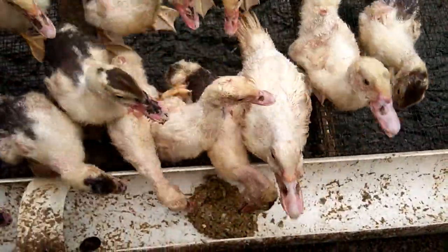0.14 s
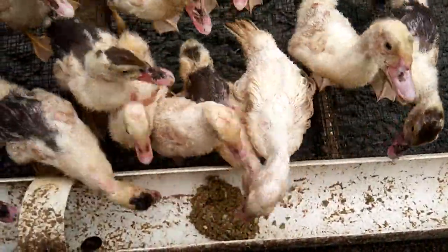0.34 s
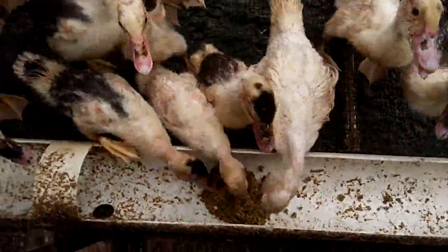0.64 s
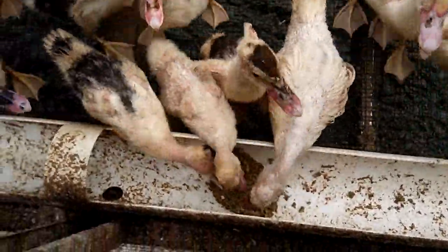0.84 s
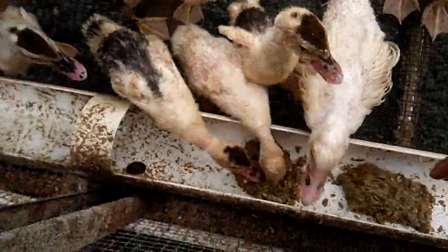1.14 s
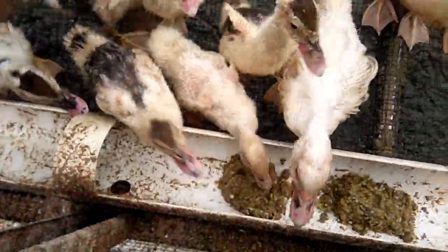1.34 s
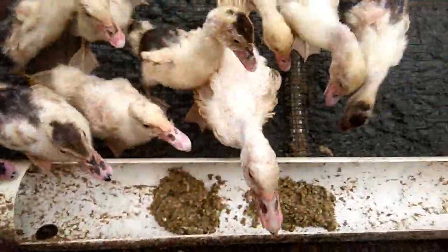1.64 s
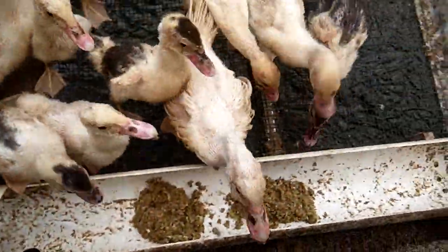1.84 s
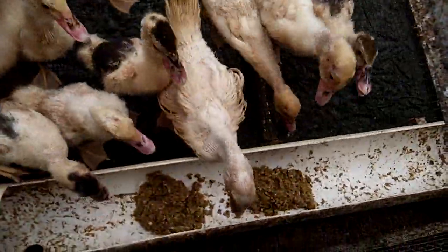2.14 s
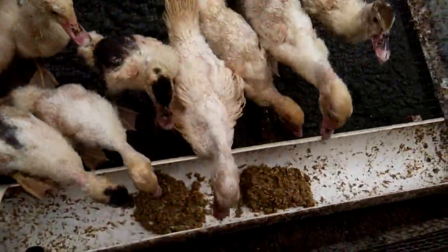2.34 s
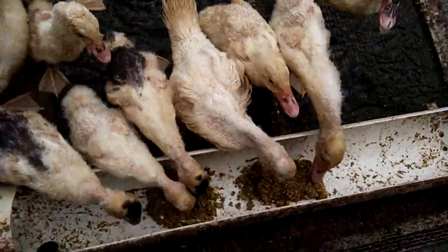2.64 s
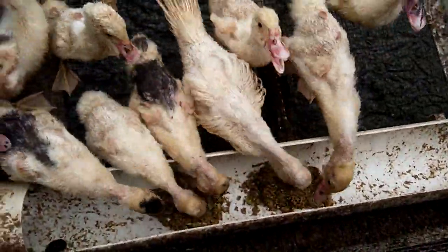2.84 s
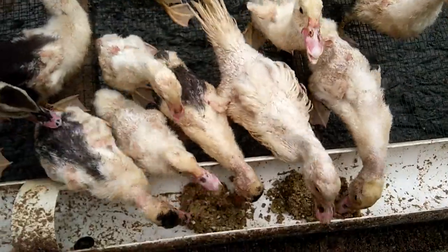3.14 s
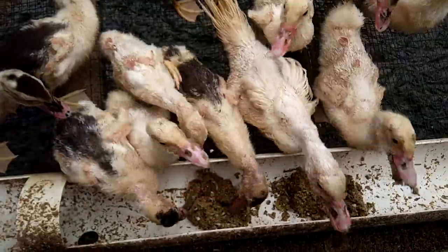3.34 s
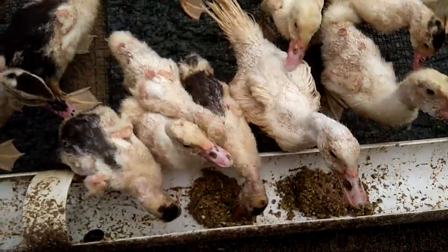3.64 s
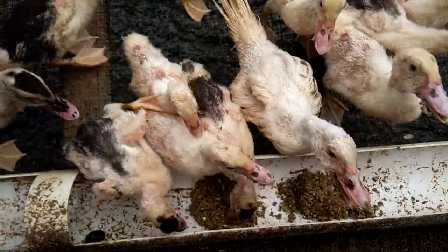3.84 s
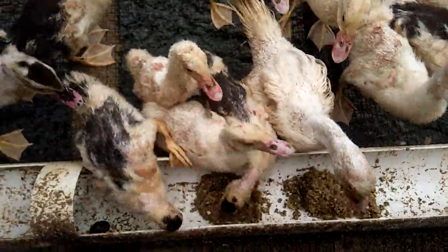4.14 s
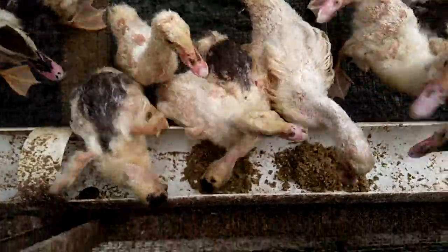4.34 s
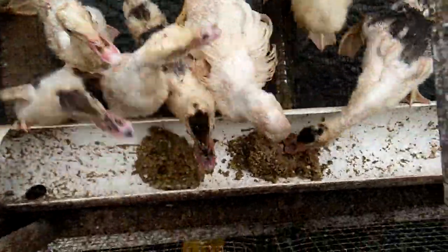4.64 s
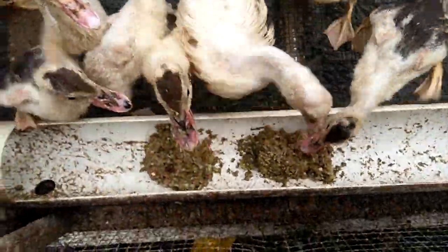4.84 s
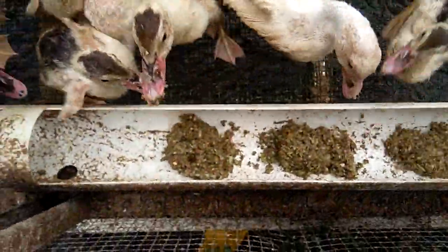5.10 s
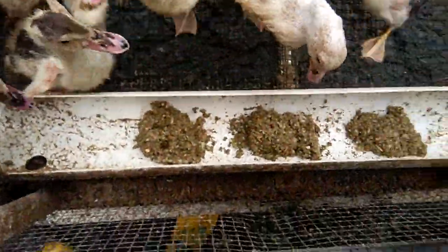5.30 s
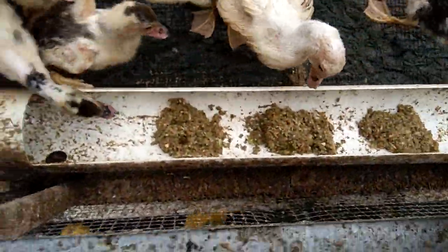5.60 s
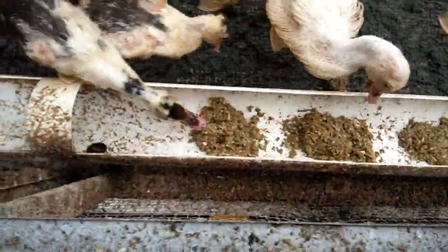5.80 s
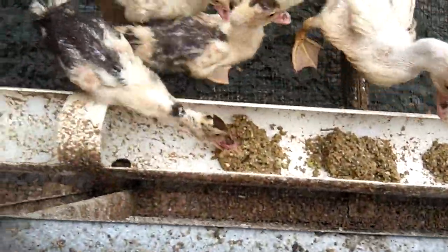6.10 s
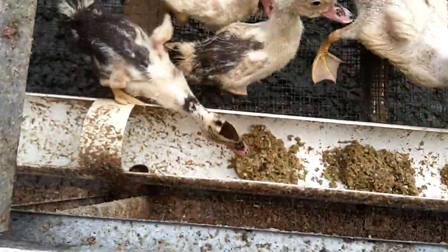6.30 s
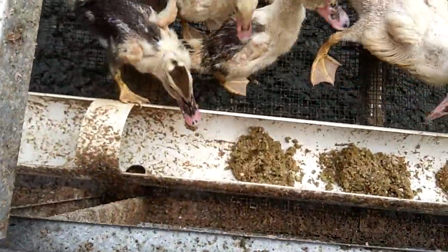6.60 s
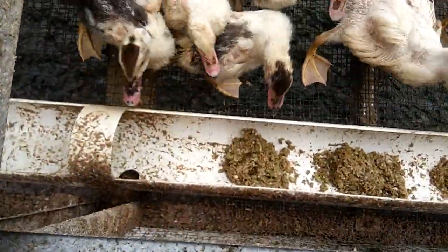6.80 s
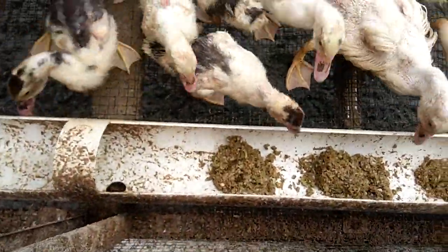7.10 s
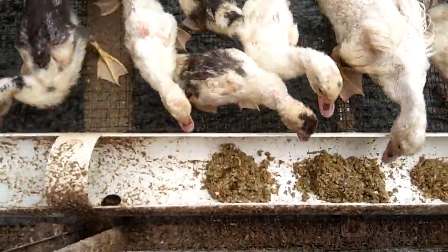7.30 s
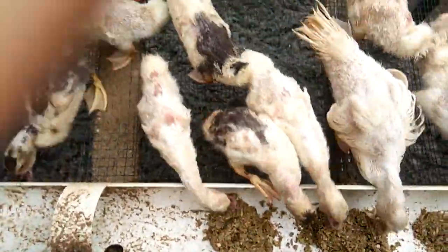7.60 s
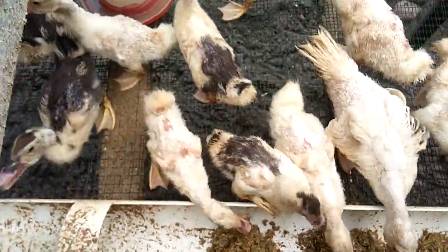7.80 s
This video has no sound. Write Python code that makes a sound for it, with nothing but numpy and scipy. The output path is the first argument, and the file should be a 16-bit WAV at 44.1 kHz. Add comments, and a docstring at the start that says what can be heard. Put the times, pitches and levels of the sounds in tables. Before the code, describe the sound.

Ducklings peep close to a small microphone in an outdoor pen, from start to end: very short whistles around 2 to 5 kHz, climbing, leaping up and dropping, often cracking into rasp. Faint low rumble and airy hiss lie beneath, the insects strongest in the first second. A dull knock comes at 0.5 s; at about 1.25 s a loud bright tick and hollow trough knocks follow until 1.5 s. From 1.9 to 4 s the peeps are mostly quieter, with faint ticks near 2.8 s and a distant hoarse fowl call at 3.4 s. From 4 s loud peeps crowd back, with low floor thumps at 4.2, 4.6 and 5.05 s, and knocks from 4.4 s. A sharp crack at 5.1 s starts more knocking until 5.4 s. Peeps space out near 6 s; a short, clearer far call at 6.8 s precedes a thump at 6.95 s. Peeping weakens after 7.7 s.

```python
"""Ducklings peep from start to end in quick rising and falling whistles, raspy at the top, over a low rumble
and insects that hiss most in the first second or so. From half a second on, bills and a scoop knock and tick
on a plastic feed trough. Near 3.4 s a hoarse fowl calls far off, then steps thump the pen floor; the fowl
calls again near 6.8 s. Whistles are bending sine waves; the other sounds are shaped noise and ringing tones."""
import sys
import numpy as np
from scipy import signal
from scipy.fft import rfft, irfft
from scipy.io import wavfile
from scipy.ndimage import uniform_filter1d

SR = 44100
rng = np.random.default_rng(int(sys.argv[2]) if len(sys.argv) > 2 else 0)


def put_to_file(sound):
    """Save the sound as 16-bit audio at rate SR, in the file named by the first command-line argument."""
    columns = np.atleast_2d(sound).T  # one column per channel
    safe = np.clip(columns, -1, 1)
    whole_steps = np.round(safe * 32767)
    wavfile.write(sys.argv[1], SR, whole_steps.astype(np.int16))


N = 350595  # length in samples

# The peeps. Each row: time of the kick (the sudden upward leap) in seconds, bend of the climb (1 is straight,
# near 0 levels off early), length of the rise in seconds, shoulder pitch before the kick in Hz, time from
# kick to end in seconds, crest pitch in Hz, slowness at the end of the fall in ms per kHz, swell during the
# rise in dB, level of the rise in dB, level of the fall in dB, level of the rasp in dB.
PEEPS = [(-.03, 0.61, 0.0264, 3150, 0.0557, 4370, 20.35, 1, -65.5, -45.5, -50.5),
         (0.11, 0.92, 0.0751, 3205, 0.0381, 4106, 14.6, 5, -45.5, -47, -57),
         (0.237, 0.55, 0.0542, 2987, 0.112, 3686, 31.5, 17, -34.5, -41, -48.5),
         (0.297, 0.53, 0.0489, 3116, 0.022, 3440, 35.3, 1, -34, -42, -44),
         (0.43, 0.926, 0.0555, 3020, 0.0595, 4900, 16, 7, -38, -44.5, -59),
         (0.561, 0.948, 0.049, 3727, 0.0507, 3665, 7.55, 24, -38, -35, -70),
         (0.573, 0.494, 0.0814, 3014, 0.0644, 4860, 6.97, 30, -33.5, -35, -40.5),
         (0.847, 1, 0.0696, 2982, 0.0725, 4800, 29.6, 17, -27.5, -32, -44),
         (.97, 0.445, 0.1364, 3372, 0.0485, 3423, 28.9, 10.5, -35.5, -37, -40.5),
         (.975, 0.908, 0.031, 3240, 0.0091, 3600, 11.5, 14, -30, -75.5, -30),
         (1.107, 0.377, 0.0699, 3403, 0.064, 4243, 12.3, 13.5, -48.5, -38, -50),
         (1.275, 0.485, 0.0509, 3145, 0.0147, 3128, 8.3, 40.5, -34.5, -61, -70.5),
         (1.303, 0.756, 0.0289, 3247, 0.0497, 4677, 11.5, 41.5, -32.5, -47.5, -42),
         (1.487, 0.447, 0.0495, 3381, 0.0351, 4410, 11.8, 61, -37, -56.5, -38),
         (1.535, 0.468, 0.0464, 3032, 0.0566, 4540, 21.6, 14, -36, -42, -50),
         (1.651, 0.351, 0.039, 3170, 0.0541, 4490, 12, 6.5, -37.5, -48, -59),
         (1.915, 0.196, 0.0474, 3794, 0.0747, 4560, 5.6, 16, -57.5, -58.5, -61.5),
         (2.07, 0.473, 0.0373, 3220, 0.0483, 4770, 15.4, -7.5, -55.5, -56.5, -66.5),
         (2.134, 0.39, 0.0255, 3047, 0.0623, 4630, 5.74, -6, -65.5, -61, -76.5),
         (2.294, 1, 0.0427, 3230, 0.056, 4106, 11.2, 12.5, -66, -69, -80.5),
         (2.439, 0.55, 0.0206, 2858, 0.0794, 4300, 30.8, 3.5, -91.5, -62, -80.5),
         (2.515, 0.307, 0.077, 2750, 0.012, 3200, 5, 5.5, -69, -71.5, -79),
         (2.581, 0.643, 0.06, 3162, 0.0458, 3730, 14.95, 1.5, -56, -40.5, -69.5),
         (2.593, 0.49, 0.0469, 3580, 0.0767, 4303, 10.4, 4.5, -53, -45, -60.5),
         (2.947, 0.92, 0.028, 3195, 0.0694, 4180, 9, -14.5, -68, -47, -68),
         (3.006, 0.74, 0.0374, 3020, 0.0609, 4100, 19.1, 10.5, -44, -49, -71.5),
         (3.088, 0.34, 0.0249, 3339, 0.046, 4292, 5.8, 14, -49.5, -59, -61.5),
         (3.179, 0.96, 0.0375, 3035, 0.0556, 4300, 9, 7.5, -65.5, -64, -81),
         (3.265, 0.45, 0.089, 2970, 0.0495, 3210, 45, 16.5, -65.5, -64.5, -78),
         (3.401, 0.566, 0.0402, 3393, 0.0578, 5075, 22.7, 16.5, -40.5, -52.5, -56),
         (3.485, 0.68, 0.035, 3170, 0.0506, 4600, 8.6, 54, -42, -62.5, -61),
         (3.633, 0.54, 0.0765, 3097, 0.057, 4780, 6, 22.5, -59, -58, -73),
         (3.738, 0.48, 0.0727, 3004, 0.0623, 4590, 29.6, 11.5, -56, -57.5, -65.5),
         (3.795, 0.984, 0.0534, 3010, 0.045, 4000, 30, -13.5, -65.5, -61, -75),
         (3.944, 0.91, 0.034, 3100, 0.019, 4190, 4.7, 10.5, -64, -60.5, -72.5),
         (4.016, 0.947, 0.0695, 3303, 0.0419, 4510, 13, 56.5, -38.5, -53, -58.5),
         (4.17, 0.271, 0.0809, 3080, 0.0506, 4730, 20.76, 33, -29.5, -32, -60.5),
         (4.386, 0.624, 0.0486, 3144, 0.0526, 4900, 12.6, 8.5, -35.5, -40.5, -61.5),
         (4.57, 0.32, 0.0665, 3247, 0.0575, 4920, 2.6, 35.5, -33, -41.5, -63),
         (4.654, 0.87, 0.0479, 2903, 0.0654, 4925, 14.9, 14, -33.5, -40, -66),
         (4.772, 0.65, 0.05, 3425, 0.021, 3800, 3.9, 18, -49.5, -57, -73.5),
         (4.816, 0.53, 0.0543, 3050, 0.0573, 4850, 10, 24.5, -35, -41, -46.5),
         (4.935, 0.162, 0.0497, 3107, 0.0651, 3970, 18.2, 4, -32, -51, -56),
         (5.008, 0.335, 0.0296, 3085, 0.0275, 3630, 15.3, 9.5, -37.5, -36.5, -72.5),
         (5.019, 1, 0.0162, 3158, 0.0439, 4820, 15.34, 1, -64.5, -43.5, -61.5),
         (5.18, 0.555, 0.0502, 2984, 0.0545, 4750, 19.2, 12, -30, -44.5, -49),
         (5.314, 0.1244, 0.05276, 3073, 0.10805, 4634, 19.5, -1.5, -35, -36.5, -56.5),
         (5.62, 0.69, 0.0349, 3086, 0.047, 4896, 5.5, 13, -43.5, -51.5, -65.5),
         (5.681, 0.299, 0.0313, 3053, 0.0558, 4664, 16.7, 15, -36, -47, -57),
         (5.774, 0.556, 0.0407, 3496, 0.049, 4275, 7.15, 15, -51, -52, -73),
         (6.055, 0.412, 0.0394, 3103, 0.05255, 4660, 17.2, 21, -30.5, -41.5, -47.5),
         (6.365, 0.21, 0.0514, 3056, 0.0595, 4430, 18.6, 32, -27, -33, -59.5),
         (6.433, 0.873, 0.0432, 2913, 0.0501, 4072, 16.7, 2.5, -38, -43.5, -65.5),
         (6.494, 0.83, 0.0427, 2943, 0.0693, 4300, 28.5, -14.5, -48.5, -53, -92.5),
         (6.642, 0.293, 0.0369, 2913, 0.0992, 4195, 57.7, 22, -47, -34, -67),
         (6.706, 0.543, 0.0534, 3008, 0.0695, 4950, 22.5, 18, -27.5, -38, -69),
         (6.865, .3, 0.02, 3665, 0.0599, 3436, 15.2, 30, -33.5, -31, -57),
         (6.875, 0.55, 0.053, 3195, 0.075, 3460, 33, 8, -34.5, -43, -74.5),
         (7.054, 0.494, 0.0837, 2933, 0.0664, 4690, 17.1, 31.5, -35.5, -43.5, -68),
         (7.285, 0.39, 0.0487, 3137, 0.0494, 4550, 7.9, 22.5, -30.5, -38, -56),
         (7.41, 0.324, 0.0644, 3065, 0.0423, 3990, 5.06, 21.5, -34.5, -44.5, -60),
         (7.475, 0.72, 0.011, 3360, 0.079, 4000, 44, 3.5, -62, -53.5, -82.5),
         (7.583, 0.164, 0.031, 3219, 0.07066, 4192, 15.6, 44.5, -34.5, -35.5, -40.5),
         (7.797, 0.153, 0.0594, 3112, 0.0447, 4660, 6.1, 5, -58.5, -60.5, -64),
         (7.893, 0.6, 0.035, 3136, 0.07, 4840, 8, 6.5, -63, -53, -80.5)]
# Tone colour of the broken voice. Each row: frequency in Hz, relative strength in dB per Hz.
RASP_COLOUR = [(1700, -31), (2300, -5.5), (3100, -15), (3900, -3), (4700, -8), (5300, -9.5), (6200, -2.5),
               (8500, -5.5), (12500, -7), (15500, -23.5)]
# Peeps whose voice splits into clear half-steps. Each row: time of the nearest kick in seconds, level in dB.
SPLITS = [(1.915, -57.5), (5.315, -56.5)]
# Sharp ticks of bill or scoop. Each row: start in seconds, level in dB, share of treble from 0 to 1.
TICKS = [(1.2546, -12, 0.84), (1.4309, -40, 0.8), (2.77, -52, 1), (2.8131, -46, 0.43), (2.833, -43, 0.17),
         (2.872, -47.5, 0.3), (2.8897, -41, 0.09), (2.912, -46, 0.08), (3.86, -46, 0.65),
         (5.0924, -17, 0.52), (5.0997, -37, 0.87)]
# Dull knocks on the trough. Each row: start in seconds, peak level in dB.
KNOCKS = [(0.472, -51.5), (1.257, -34.5), (1.338, -35.5), (1.398, -51), (1.449, -49), (4.36, -40.5),
          (4.422, -37), (4.629, -39.5), (4.772, -45.5), (5.089, -29.5), (5.183, -37.5), (5.242, -35.5),
          (5.3, -37), (5.411, -50), (3.045, -52.5), (7.63, -51.5)]
# Tones the trough rings at. Each row: middle frequency in Hz, relative level in dB, time to fade 60 dB in seconds.
TROUGH_TONES = [(461.2, -10, 0.028), (598.8, 13.5, 0.0306), (946.5, 2, 0.032)]
# Steps on the pen floor. Each row: start in seconds, level in dB, clatter of the boards in relative dB.
STEPS = [(4.208, -27, -14), (4.62, -30.5, -17), (5.055, -34.5, -10.5), (5.714, -42, -14),
         (3.544, -49.5, -8), (6.471, -36, -19), (6.946, -28.5, -13), (7.432, -48.5, -17.5)]
# Calls of the far fowl. Each row: start in seconds, length in seconds, base pitch in Hz, level in dB,
# hoarseness from 0 to 1.
FOWL_CALLS = [(3.419, 0.343, 803.2, -50, 0.88), (6.798, 0.13, 787.9, -55, 0.16)]
# Tone colour of the open air. Each row: frequency in Hz, relative strength in dB per Hz.
AIR_COLOUR = [(76, -35.5), (130, -1), (2270, -7), (2880, -7), (6910, -11), (15000, -17)]
# Changing background. Each row: time in seconds, low rumble in dB, insect hiss in dB.
YARD_LEVELS = [(0, -67, -63), (.35, -57.5, -74.5), (.9, -62, -61), (1.698, -69.5, -72.5), (2.2, -73, -88),
               (3.999, -70.5, -82), (4.9, -58, -75), (6.3, -70.5, -83), (7.95, -69, -74)]

# Pitch of a peep
START_HZ, END_HZ, KICK_HZ_PER_S = 2064.3, 2137, 58000
CURL_HZ = 2484.5  # the fall starts steep and flattens out
ROUND_S = 0.005135  # rounds the corners of the pitch curve
# Loudness of a peep
EDGE_S = 0.00529  # fade at each end
HOLD_SHARE = 0.195  # last part of the rise, at full voice
OPEN_HZ, OPEN_SHARE = 2855, 0.21  # passing this pitch the voice opens at once, by this share of its swell
THIN_ABOVE_HZ, THIN_DB_PER_KHZ, THINNEST_DB = 3351, 22.5, 24  # high pitches lose level, at most THINNEST_DB
SOFT_BELOW_HZ, SOFT_DB_PER_KHZ = 3203.5, 7.5  # low pitches are softer
# Roughness of a peep
WOBBLE = 0.01  # random share of the pitch
CREST_FUZZ = 1.3  # per kHz above THIN_ABOVE_HZ
FALL_DULL_DB = 14  # the overtone drops this much in the fall
OVERTONE_TOP_HZ, OVERTONE_DB_PER_KHZ = 6900, 11  # an overtone above this weakens
RASP_LEAD = 0.2784  # the rasp sets in this share of the rise before the kick
STALL = 0.37  # share of the leap above the shoulder that the broken voice follows
BREATH_DB = -28  # under the louder of rise and fall
EDGE_HZ = 15700  # upper limit of the microphone


def peeps():
    """The near birds, with uneven breath; the raspier a peep, the rougher its whistle."""
    out = np.zeros(N)
    for *row, rise_db, fall_db, rasp_db in PEEPS:
        rough = 0.0059 + 0.672 * min(amp(rasp_db - rise_db), 1)
        add(out, *peep(*row, rise_db, fall_db, rough))
    return out * amp(1.8 * smooth_noise(N, 130))


def peep(kick, bend, rise, shoulder_hz, arch, crest_hz, fall, swell_db, rise_db, fall_db, rough):
    """Changes level by its swell, opens, holds up to the kick, thins at the crest and sounds in the drop."""
    t, hz = pitch(bend, rise, shoulder_hz, arch, crest_hz, fall)
    near_crest = hz > 0.98 * hz.max()
    drop = max(t[near_crest][-1], 0.002)
    first_db = rise_db - (1 - OPEN_SHARE) * swell_db
    level_db = np.interp(t, [-rise, -HOLD_SHARE * rise, 0, drop], [first_db, rise_db, rise_db, fall_db])
    closed = np.clip((OPEN_HZ - hz) / 120, 0, 1) * (t < 0)
    level_db = level_db - OPEN_SHARE * swell_db * closed
    edges = np.minimum(np.minimum(t + rise, arch - t) / EDGE_S, 1)
    return kick - rise, edges * whistle(hz, level_db, t > drop, rough)


def pitch(bend, rise, shoulder_hz, arch, crest_hz, fall):
    """Climbs to a shoulder, kicks up towards the crest, drops steeply; times count from the kick."""
    t = np.arange(-rise, arch, 1 / SR)
    climb = START_HZ + (shoulder_hz - START_HZ) * np.clip(1 + t / rise, 0, 1) ** abs(bend)
    leap = np.minimum(shoulder_hz + KICK_HZ_PER_S * t, crest_hz)
    left_hz = (arch - t) * 1e6 / fall  # ms per kHz turned into Hz still to fall
    descent = END_HZ + left_hz + left_hz ** 2 / CURL_HZ
    hz = np.where(t < 0, climb, np.minimum(leap, descent))
    return t, uniform_filter1d(hz, round(ROUND_S * SR), mode="nearest")


def whistle(hz, level_db, falling, rough):
    """A near sine, loudest mid-range; higher pitch brings more fuzz and, at first, a stronger overtone."""
    turn = turns(hz * (1 + WOBBLE * smooth_noise(len(hz), 180)))
    strain = np.clip((hz - 2700) / 600, 0, 1)
    high_khz = np.maximum(hz - THIN_ABOVE_HZ, 0) / 1000
    low_khz = np.maximum(SOFT_BELOW_HZ - hz, 0) / 1000
    loss_db = np.minimum(THIN_DB_PER_KHZ * high_khz, THINNEST_DB) + SOFT_DB_PER_KHZ * low_khz
    overtone = amp(-29.5 - 7.73 * rng.random() + 16.6 * strain - FALL_DULL_DB * falling)
    overtone = overtone * (1 + 0.43 * smooth_noise(len(hz), 120))
    overtone = overtone * amp(-OVERTONE_DB_PER_KHZ * np.maximum(2 * hz - OVERTONE_TOP_HZ, 0) / 1000)
    tone = np.sin(turn) + overtone * np.sin(2 * turn)
    fuzz = 1 + rough * smooth_noise(len(hz), 21.18) + CREST_FUZZ * high_khz * smooth_noise(len(hz), 52)
    return np.sqrt(2) * amp(level_db - loss_db) * tone * fuzz


def breath():
    """From the kick on, each bird's air turns to a dull, ragged haze of noise that trails off."""
    gate = np.zeros(N)
    for kick, _, _, _, arch, *_, rise_db, fall_db, _ in PEEPS:
        t = np.arange(0, arch + 0.1, 1 / SR)
        trail = decay(np.maximum(t - arch, 0), 0.092, max(rise_db, fall_db) + BREATH_DB)
        add(gate, kick, trail * np.minimum(t / EDGE_S, 1))
    return gate * band(3600, 2800, N) * amp(3.5 * smooth_noise(N, 120))


def rasps():
    """The voice breaks at the top: uneven overtones and half-steps of its pitch, in banded hiss."""
    gate, broken = np.zeros(N), np.zeros(N)
    order = np.arange(2, 11)[:, None] / 2  # multiples of the pitch: 1, 1.5, 2 .. 5
    rasp_hz, rasp_db = np.transpose(RASP_COLOUR)
    for kick, *shape, _, _, _, db in PEEPS:
        t, hz = pitch(*shape)
        fade_in = (t - RASP_LEAD * t[0]) / 0.0268
        fade_out = (t[-1] - t) / 0.0455
        swell = amp(db) * np.clip(np.minimum(fade_in, fade_out), 0, 1)
        shoulder_hz = shape[2]
        hz = np.minimum(hz, shoulder_hz + STALL * (hz - shoulder_hz) * (hz > shoulder_hz))
        turn = turns(hz * (1 + 0.01616 * smooth_noise(len(t), 97)))
        colour_db = np.interp(order * hz, rasp_hz, rasp_db, right=-90)
        colour_db = colour_db + 4 * rng.standard_normal(order.shape)  # uneven in its own way
        colour_db = colour_db - 2.2 * (order % 1 > 0)  # half-steps are weaker
        lines = amp(colour_db) * smooth_noise((len(order), len(t)), 40) * np.sin(order * turn)
        add(gate, kick + t[0], swell)
        add(broken, kick + t[0], swell * lines.sum(0))
    hiss = amp(-7) * gate * banded_hiss()
    return amp(2.56 * smooth_noise(N, 60)) * (hiss + amp(1.5) * broken)


def banded_hiss():
    """Rasp-coloured noise whose narrow bands grow and fade at random."""
    _, _, bands = signal.stft(coloured(RASP_COLOUR), nperseg=256)
    patches = uniform_filter1d(rng.standard_normal(bands.shape), size=3, axis=0)  # across pitch
    patches = evened(uniform_filter1d(patches, size=14, axis=1))  # across time
    return signal.istft(bands * amp(7.05 * patches), nperseg=256)[1][:N]


def splits():
    """Every other pulse is weaker: clear lines at half-steps of the pitch, up to the kick."""
    out = np.zeros(N)
    order = np.arange(1, 7)[:, None] / 2  # multiples of the pitch: 0.5, 1 .. 3
    rasp_hz, rasp_db = np.transpose(RASP_COLOUR)
    for s, db in SPLITS:
        kick, *shape = min(PEEPS, key=lambda row: abs(row[0] - s))[:7]
        t, hz = pitch(*shape)
        swell = np.clip(np.minimum(t - 0.762 * t[0], 0.006 - t) / EDGE_S, 0, 1)
        lines = amp(np.interp(order * hz, rasp_hz, rasp_db)) * np.sin(order * turns(hz))
        lines = lines * (1 + 0.6 * smooth_noise(lines.shape, 150))
        add(out, kick + t[0], amp(db) * swell * lines.sum(0))
    return out


def knocks():
    """Each blow rings the trough tones, a little differently, with a short rattle."""
    out, t = np.zeros(N), np.arange(SR // 10) / SR
    for s, db in KNOCKS:
        blow = rng.standard_normal(len(t)) * (decay(t, 0.0204) + decay(t, 0.187, -20))
        blow = blow * np.minimum(t / 0.00396, 1)
        ring = np.zeros(len(t))
        for hz, tone_db, fade_s in TROUGH_TONES:
            ring += decay(t, fade_s, tone_db) * np.sin(2 * np.pi * hz * rng.uniform(0.8, 1.25) * t)
        knock = uniform_filter1d(signal.fftconvolve(blow, ring)[:len(t)], 12)  # softens the treble
        add(out, s, amp(db) * knock / abs(knock).max())
    return out


def ticks():
    """A woody clack and a bright crack of ringing noise, with a quick and a slower decay."""
    out, t = np.zeros(N), np.arange(SR // 10) / SR
    for s, db, treble in TICKS:
        clack = band(1360, 804, len(t)) + 0.5 * band(2847, 900, len(t))
        crack = band(14200, 9850, len(t)) + 0.323 * band(4670, 1850, len(t))
        blend = (1 - treble) * clack + treble * crack
        fade = decay(t, 0.073, -4.5) + decay(t, 0.01864, 7.5)
        add(out, s, amp(db - 11.5) * blend * fade * np.minimum(t / 0.000534, 1))
    return out


def steps():
    """The floor boards boom in two low tones, then rumble on unevenly as noise."""
    out, t = np.zeros(N), np.arange(SR) / SR
    for s, db, clatter_db in STEPS:
        boom = np.sin(2 * np.pi * 76 * t) + 0.44 * np.sin(2 * np.pi * 136 * t)
        boom = boom * decay(t, 0.234)
        clatter = amp(clatter_db) * (band(240.3, 120, SR) + band(502.5, 330, SR))
        rumble = (band(71.14, 65, SR) + clatter) * decay(t, 0.8114, -8.5)
        rumble = rumble * amp(2.88 * smooth_noise(SR, 340))
        add(out, s, amp(db) * (boom + rumble) * np.minimum(t / 0.0106, 1))
    return out


def pen(x):
    """Short scattered echoes from the trough, rails and other birds."""
    t = np.arange(SR // 3) / SR
    echoes = rng.standard_normal(len(t)) * (rng.random(len(t)) < 0.05)
    echoes = echoes * (decay(t, 0.0506) + decay(t, 0.2283, -18))
    echoes = uniform_filter1d(echoes, size=5)
    return signal.fftconvolve(x, echoes / np.linalg.norm(echoes))[:N]


def fowl():
    """Two wavering tones an octave apart on a low arch of pitch, drowned in throat noise when hoarse."""
    out = np.zeros(N)
    for s, length, hz, db, hoarse in FOWL_CALLS:
        u = np.linspace(0, 1, round(length * SR))  # progress through the call
        arch = np.sin(np.pi * u)
        turn = turns(hz * (0.96 + 0.053 * arch))
        drift = uniform_filter1d(rng.standard_normal((2, len(u))), 400, axis=1)
        waver = 1 + 0.64 * evened(drift)
        low_tone = waver[0] * np.sin(turn)
        clear = 0.384 * low_tone + waver[1] * np.sin(2 * turn)
        throat = band(1009.7, 161, len(u)) + 0.162 * band(1774, 610, len(u))
        voice = (1 - hoarse) * clear + hoarse * (throat * arch + 0.164 * low_tone)
        add(out, s, amp(db) * voice * arch ** 0.138)
    return out


def yard():
    """Noise bands: lumpy low rumble, insects and feet shuffling, over the open air."""
    s, rumble_db, insect_db = np.transpose(YARD_LEVELS)
    t = np.arange(N) / SR
    rumble = amp(np.interp(t, s, rumble_db)) * band(63, 49.9, N)
    insects = amp(np.interp(t, s, insect_db)) * (band(6616, 1100, N) + band(13030, 6800, N))
    shuffle_db = -84.5 + 8 * np.minimum(smooth_noise(N, 690), 2)
    shuffle = amp(shuffle_db) * band(552, 530, N)
    return rumble + insects + shuffle + amp(-71.5) * coloured(AIR_COLOUR)


def amp(db):
    """Turns decibels into a multiplier."""
    return 10 ** (np.asarray(db) / 20)


def decay(t, fade_s, start_db=0):
    """A fade that starts at start_db and loses 60 dB every fade_s seconds."""
    return amp(start_db - 60 * t / fade_s)


def turns(hz):
    """Adds up a changing pitch into the angle of its wave."""
    return 2 * np.pi * np.cumsum(hz) / SR


def evened(x):
    """Scales a sound to an average (rms) strength of 1."""
    return x / np.sqrt(np.mean(x ** 2) + 1e-20)


def smooth_noise(shape, span):
    """Noise smoothed three times over span samples, rms 1."""
    x = rng.standard_normal(shape)
    for _ in range(3):
        x = uniform_filter1d(x, max(int(span), 1))
    return evened(x)


def band(hz, width_hz, size):
    """Noise rung twice through one resonance, rms 1."""
    b, a = signal.iirpeak(hz, hz / width_hz, SR)
    once = signal.lfilter(b, a, rng.standard_normal(size))
    return evened(signal.lfilter(b, a, once))


def coloured(points):
    """Noise with the spectrum drawn through the points, rms 1."""
    hz, db = np.transpose(points)
    shape_db = np.interp(np.log(np.fft.rfftfreq(N, 1 / SR) + 1), np.log(hz), db)
    return evened(irfft(rfft(rng.standard_normal(N)) * amp(shape_db), N))


def add(mix, s, sound):
    """Adds a sound at s seconds, cutting off what lies outside the mix."""
    at = round(s * SR)
    part = mix[max(at, 0):][:len(sound) + min(at, 0)]
    part += sound[max(-at, 0):][:len(part)]


def scene():
    """Only the birds' voices, knocks and ticks echo in the pen."""
    near = peeps() + breath() + rasps() + splits() + knocks() + ticks()
    return (near + amp(-11) * pen(near) + steps() + fowl() + yard())[None]


def record(dry):
    """The small microphone loses the deepest bass; then the top of the treble is cut off."""
    bass_cut = signal.butter(2, 42, "high", fs=SR, output="sos")
    treble_cut = signal.firwin(511, EDGE_HZ, window=("kaiser", 9), fs=SR)
    return signal.oaconvolve(signal.sosfilt(bass_cut, dry), treble_cut[None], "same")


dry = scene()
out = record(dry)
put_to_file(out)
```